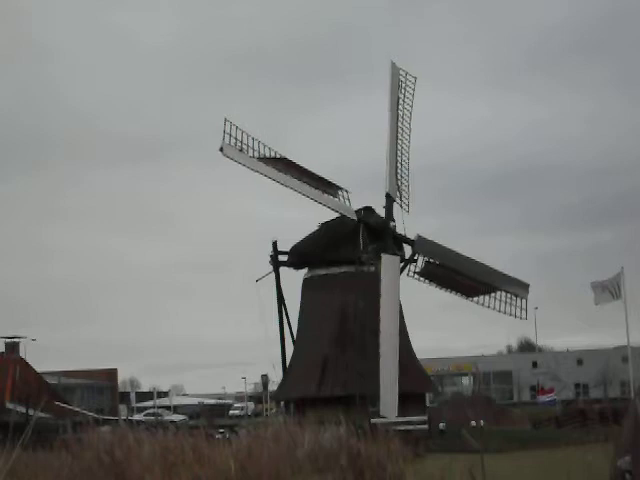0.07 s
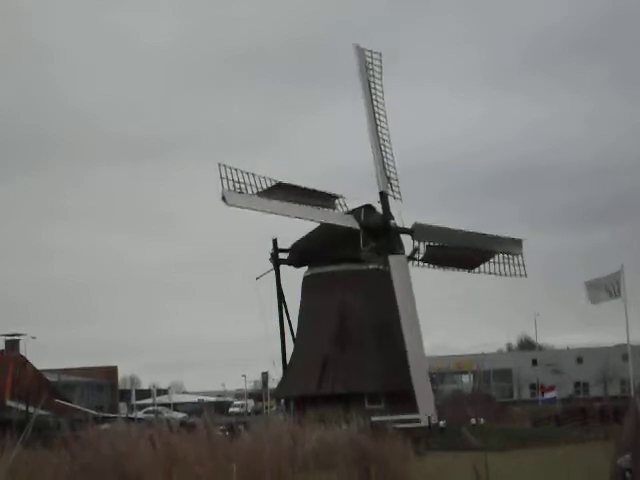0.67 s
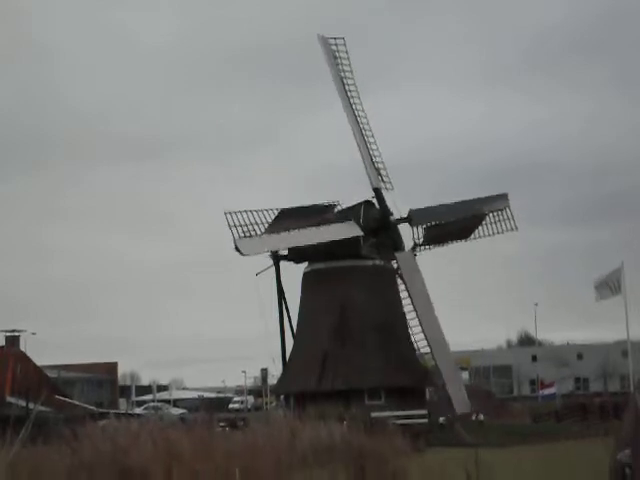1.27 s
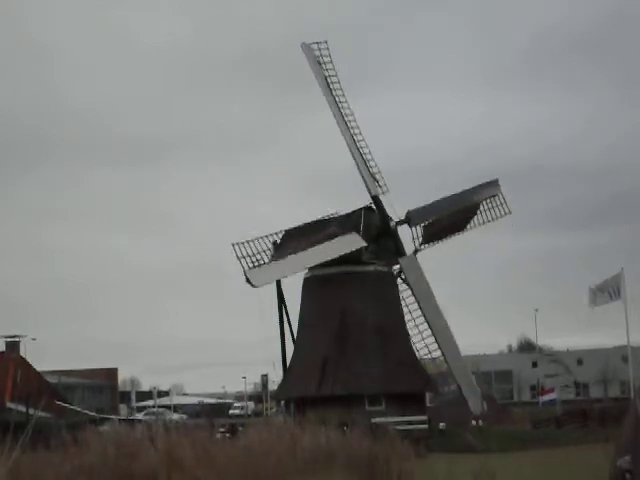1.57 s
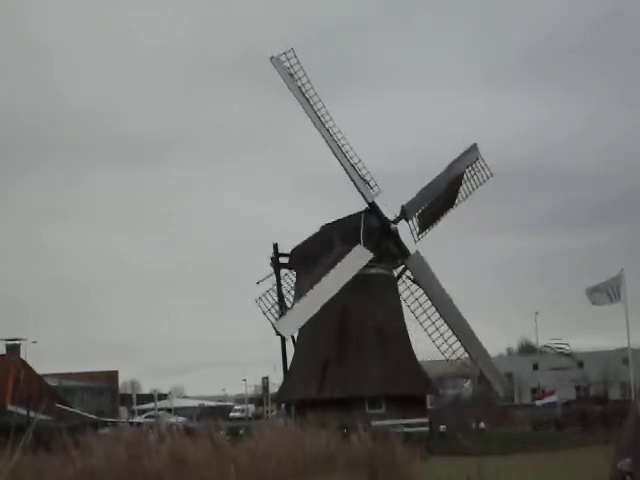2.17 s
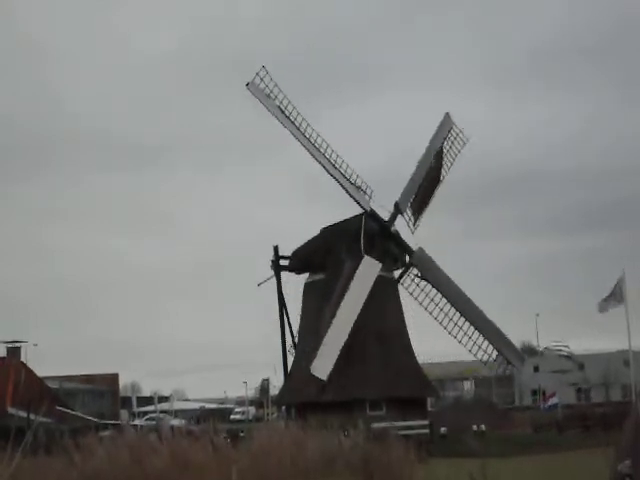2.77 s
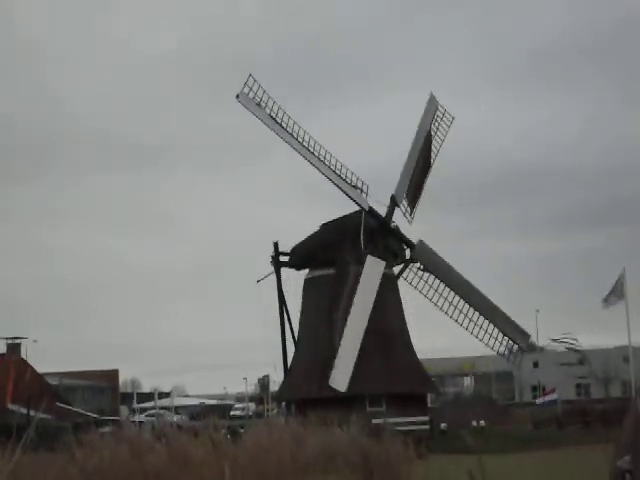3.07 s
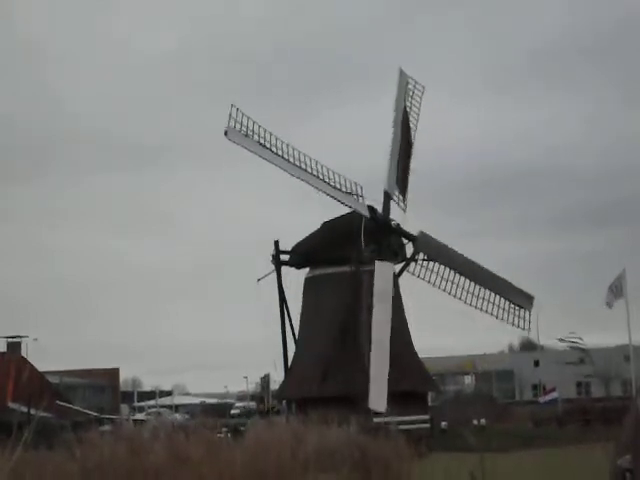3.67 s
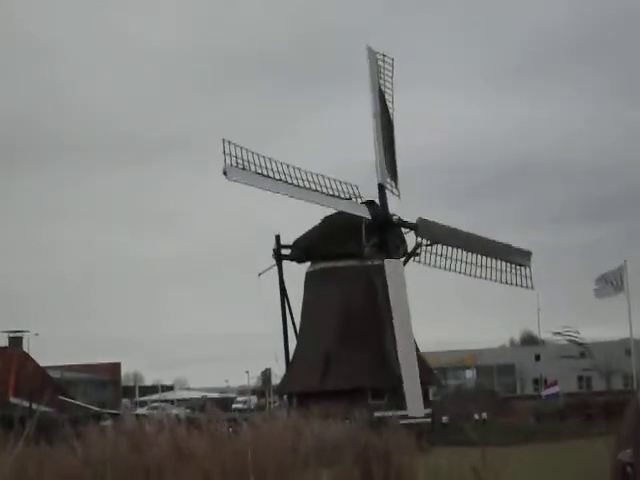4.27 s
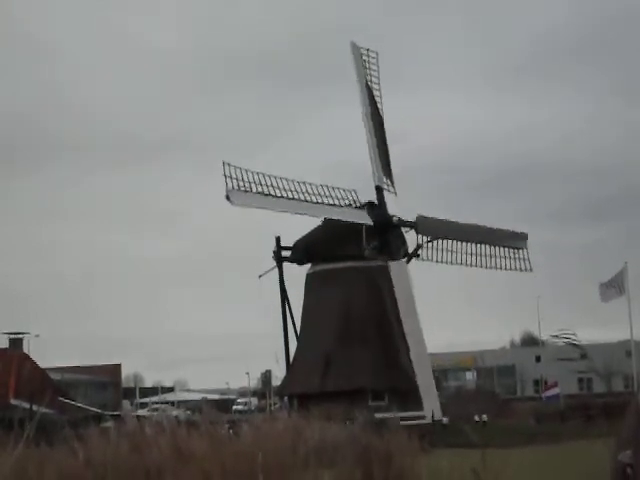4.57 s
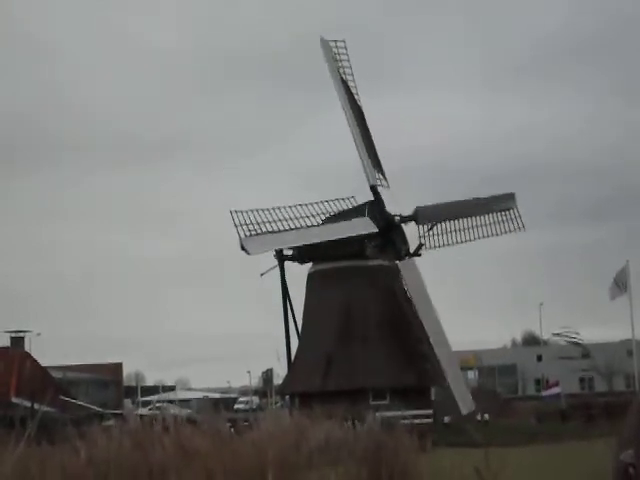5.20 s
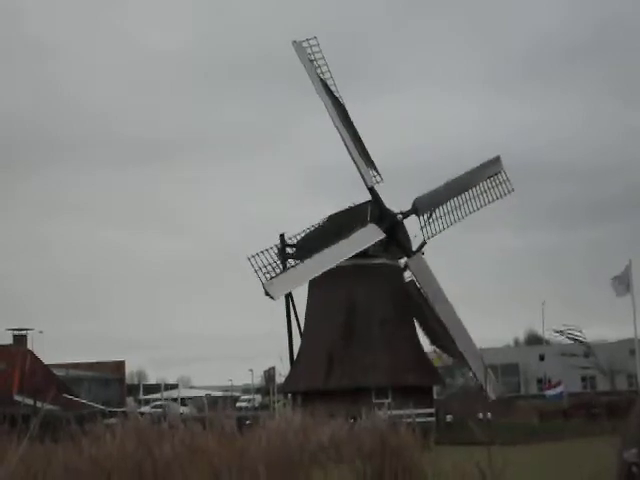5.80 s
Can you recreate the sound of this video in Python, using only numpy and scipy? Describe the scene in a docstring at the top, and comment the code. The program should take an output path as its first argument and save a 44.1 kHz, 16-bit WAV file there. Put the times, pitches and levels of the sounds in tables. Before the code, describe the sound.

A small camera stands outdoors near a windmill, its microphone open to the wind. The sound starts with a sharp pop, then a deep, uneven rumble and short dull puffs continue over faint, even hiss. Two barely audible distant chirps come in the first half, and a few faint far squeaks later. Fingers bump softly on the camera, most clearly near the end, around one sharp click.

```python
"""A small camera outdoors by a turning windmill, its microphone open to the wind.
The sound switches on with a pop; then eddies buffet the microphone with a deep rumble and short puffs
over a faint, even hiss. Two far chirps come in the first half, a few far squeaks later. Fingers bump
softly on the camera body now and then, most clearly near the end, around one sharp click."""
import sys
import numpy as np
from scipy import signal
from scipy.fft import rfft, irfft, next_fast_len
from scipy.io import wavfile
from scipy.ndimage import uniform_filter1d

SR = 44100
rng = np.random.default_rng(int(sys.argv[2]) if len(sys.argv) > 2 else 0)


def persist_wave(psi):
    """Save psi, clipped to +-1, as 16-bit WAV."""
    counts = np.round(np.clip(psi, -1, 1) * 32767).astype(np.int16)
    wavfile.write(sys.argv[1], SR, np.atleast_2d(counts).T)


N = 257544
TIME = np.arange(N) / SR
SWITCH_ON_S = 0.2583

# spectrum of the eddies at the microphone port: [f/Hz, relative level/dB]
EDDY_SPECTRUM = [(3, -3), (8, -0.5), (13, 8), (19, -2), (30, -11.5), (45, -15.5), (60, -23), (80, -28.5),
                 (110, -41), (160, -48), (250, -58), (600, -100), (12000, -140)]


def wind(throb_top_hz=27.85, rumble_split_hz=62.2, rumble_top_hz=121.3, gust_s=0.097, build_up_s=0.017):
    """Wind right on the microphone: large eddies throb, middling ones rumble, small ones flutter."""
    # breeze strength, heard as the low rumble: [t/s, level/dB]
    breeze_levels = [(0.38, -49), (0.5, -50), (0.65, -48.5), (0.83, -37), (0.97, -42), (1.1, -47),
                     (1.3, -47), (1.6, -43), (1.8, -45), (1.96, -43), (2.27, -50.5), (2.5, -39.5),
                     (2.65, -55.5), (2.8, -42.5), (3.17, -45), (3.52, -45), (4.13, -43.5), (4.33, -47.5),
                     (4.7, -43), (4.9, -48), (5.3, -50.5), (5.5, -41), (5.8, -43)]
    # the deepest throb: [t/s, level/dB]
    throb_levels = [(0.35, -30), (0.7, -29.5), (1.1, -39.5), (1.33, -25.5), (1.46, -27), (1.7, -40.5),
                    (2.05, -36), (2.28, -28.5), (2.48, -44.5), (2.64, -25.5), (2.88, -27.5), (3.0, -39),
                    (3.15, -28), (3.35, -41), (3.49, -26.5), (3.62, -35.5), (4.1, -30.5), (4.5, -34),
                    (5.1, -29), (5.62, -38), (5.78, -30.5)]
    # the upper rumble: [t/s, level/dB]
    upper_levels = [(0.4, -56), (0.65, -52.5), (0.9, -63), (1.17, -55.5), (1.4, -54), (1.52, -59),
                    (1.8, -63.5), (1.95, -58), (2.17, -56), (2.33, -57), (2.5, -56), (2.6, -56),
                    (2.76, -57), (2.9, -60), (3.02, -53), (3.22, -63), (3.41, -67), (3.61, -54),
                    (3.77, -64.5), (3.87, -57), (4.12, -55), (4.3, -61), (4.72, -59.5), (4.92, -59),
                    (5.15, -54.5), (5.6, -61), (5.8, -63)]
    breeze_db = in_time(breeze_levels)
    large = evened(cut(noise(EDDY_SPECTRUM), throb_top_hz, "low", order=4), gust_s)
    small = evened(cut(noise(EDDY_SPECTRUM), rumble_top_hz, "high", order=4), gust_s)
    throb = large * from_db(in_time(throb_levels))
    low = eddies(throb_top_hz, rumble_split_hz) * from_db(breeze_db)
    upper = eddies(rumble_split_hz, rumble_top_hz) * from_db(in_time(upper_levels))
    rumble = (low + upper) * from_db(-0.4 * drift(rate_hz=17))
    # the flutter follows a third of the breeze's swing and flickers by itself
    swing_db = breeze_db - breeze_db.mean()
    flutter = small * from_db(-69 + 0.33 * swing_db + 2 * drift(rate_hz=5.4))
    # the bass builds up just after the microphone comes alive
    build_up = np.clip((TIME - SWITCH_ON_S) / build_up_s, 0, 1)
    return (throb + rumble + flutter) * build_up


def eddies(low_hz, high_hz):
    """Buffeting by eddies of one range of sizes, held near rms 1."""
    buffeting = cut(noise(EDDY_SPECTRUM), low_hz, "high", order=8)
    return evened(cut(buffeting, high_hz, "low", order=6), span_s=0.12)


def puffs(lowest_hz=80):
    """Single eddies hit the microphone port squarely: each is a short, dull swell of air."""
    # puffs on the port: [t/s, level/dB, top f/Hz]
    hits = [(.58, -55.5, 124), (.82, -59, 85), (1.16, -59.5, 99), (1.315, -58.5, 184), (2.14, -61, 101),
            (2.455, -66, 220), (2.675, -62, 169), (3.02, -64, 113), (4.12, -67, 220), (4.76, -53.5, 109)]
    out = np.zeros(N)
    for at_s, level_db, top_hz in hits:
        swell = swell_at(at_s, length_s=0.055)
        turbulence = cut(rng.standard_normal(N), lowest_hz, "high")
        air = swell * cut(turbulence, top_hz, "low", order=4)
        out += from_db(level_db) * air * np.sqrt(np.sum(swell ** 2) / np.sum(air ** 2))
    return out


def clicks():
    """Sudden steps in the signal: the opening pop and a later, brighter click of opposite sign."""
    pop = band_limit(sharp_step(SWITCH_ON_S, level_db=-17, settle_s=0.18), hz=11400)
    return pop - sharp_step(at_s=5.4233, level_db=-23, settle_s=0.038)


def sharp_step(at_s, level_db, settle_s):
    """A sudden offset that dies away: heard as one sharp click."""
    return from_db(level_db) * (TIME >= at_s) * np.exp(-np.maximum(TIME - at_s, 0) / settle_s)


def bumps(casing_db=-12.5):
    """Fingers push the camera close to the microphone: the hand damps its body, the hollow casing rings."""
    # finger touches: [t/s, push level/dB, softness cut-off f/Hz, lowest f/Hz, hollow ring offset/dB]
    touches = [(0.716, -44, 230, 141, -5), (3.075, -46, 255, 142, -3), (5.2023, -36, 600, 192, 2),
               (5.451, -35, 160, 70, -3), (5.7384, -29, 507, 36, -4.5)]
    # modes of the hand-held body: [f/Hz, gain/dB, t60/s]
    body_modes = [(54, 0.5, 0.1), (85, 3, 0.025), (151, -5, 0.034), (282, -7, 0.021), (390, -14, 0.014),
                  (700, -11, 0.015), (1750, 4.5, 0.015)]
    out = np.zeros(N)
    for at_s, level_db, soft_hz, lowest_hz, hollow_db in touches:
        touch = from_db(level_db) * signal.unit_impulse(N, int(at_s * SR))
        push = cut(cut(touch, soft_hz, "low", order=3), lowest_hz, "high")
        out += sum(from_db(db) * ring(push, hz, t60) for hz, db, t60 in body_modes)
        # the casing rings more or less according to where the finger lands
        out += from_db(casing_db + hollow_db) * ring(push, hz=470, t60=0.043)
    return out


def squeaks():
    """Faint squeaks far off: each is a brief swell of narrow, wavering tone."""
    # far squeaks: [t/s, f/Hz, level/dB, length/s]
    tones = [(4.29, 2050, -79, 0.13), (4.45, 1980, -82, 0.14), (5.385, 1880, -76, .035),
             (5.49, 1585, -74, .044)]
    return sum(from_db(db) * swell_at(at_s, length_s) * evened(wavering(hz, width_hz=45), length_s)
               for at_s, hz, db, length_s in tones)


def chirps(length_s=0.11):
    """Far off, perhaps a small bird: short, husky clusters of high partials, barely above the hiss."""
    # far chirps: [t/s, level/dB]
    calls = [(0.48, -80), (2.255, -79.5)]
    # partials of a chirp: [f/Hz, relative level/dB]
    partials = [(3620, -5), (3870, -2), (4140, 0.5), (4330, -5)]
    voice = sum(from_db(db) * evened(wavering(hz, width_hz=75), length_s) for hz, db in partials)
    return voice * sum(from_db(db) * swell_at(at_s, length_s) for at_s, db in calls)


def hiss(hiss_db=-64, ring_db=-87):
    """The noise floor: amplifier noise and distant air, with a faint ring and a trace of whine."""
    # spectrum of the even hiss: [f/Hz, relative level/dB]
    hiss_spectrum = [(40, 6), (250, -1), (400, -2), (700, -4.5), (1500, -7.5), (3000, -10), (6000, -13.5),
                     (9000, -14.5), (10100, -15), (10550, -20.5), (11000, -33), (11700, -30.5),
                     (12500, -73), (16000, -54)]
    # thin whine of the electronics: [f/Hz, rms level/dB]
    whine_tones = [(7139, -93), (7850, -99)]
    air = noise(hiss_spectrum) * from_db(hiss_db)
    faint_ring = wavering(hz=3706, width_hz=86) * from_db(ring_db)
    whine = sum(np.sqrt(2) * from_db(db) * np.sin(2 * np.pi * (hz * TIME + rng.random()))
                for hz, db in whine_tones)
    return (air + faint_ring + whine) * (TIME >= SWITCH_ON_S)


def from_db(db):
    """Decibels to gain."""
    return 10 ** (np.asarray(db) / 20)


def rms_one(x):
    """Scale to unit rms."""
    return x / np.sqrt(np.mean(x ** 2) + 1e-20)


def evened(x, span_s):
    """Hold the slow level at rms 1, leaving the quick lumps."""
    size = max(int(span_s * SR), 1)
    power = uniform_filter1d(uniform_filter1d(x ** 2, size), size)
    return x / np.sqrt(np.maximum(power, 1e-12))


def in_time(rows):
    """A curve through [t/s, value] rows, at every sample."""
    return np.interp(TIME, *np.transpose(rows))


def swell_at(at_s, length_s):
    """A smooth rise and fall of height 1."""
    return np.exp(-(2 * (TIME - at_s) / length_s) ** 2)


def cut(x, hz, kind, order=2):
    """Causal low-pass or high-pass."""
    return signal.sosfilt(signal.butter(order, hz, kind, fs=SR, output="sos"), x + 1e-18)


def band_limit(x, hz):
    """Steep, symmetric low-pass of a digital recorder."""
    return signal.sosfiltfilt(signal.butter(16, hz, fs=SR, output="sos"), x + 1e-18)


def noise(spectrum):
    """Steady noise coloured by [f/Hz, relative level/dB] rows; rms 1."""
    size = next_fast_len(N)
    hz, level_db = np.transpose(spectrum)
    grid_hz = np.maximum(np.fft.rfftfreq(size, 1 / SR), 1)
    gain = from_db(np.interp(np.log(grid_hz), np.log(hz), level_db))
    return rms_one(irfft(rfft(rng.standard_normal(size)) * gain, size)[:N])


def drift(rate_hz):
    """Smooth random wander, up to about rate_hz; rms 1."""
    hz = np.fft.rfftfreq(N, 1 / SR)
    return rms_one(irfft(rfft(rng.standard_normal(N)) * np.exp(-(hz / rate_hz) ** 2), N))


def wavering(hz, width_hz):
    """A narrow, unsteady tone; rms 1."""
    phase = 2 * np.pi * hz * TIME
    return drift(width_hz) * np.sin(phase) + drift(width_hz) * np.cos(phase)


def ring(push, hz, t60):
    """A unit push sets a dying sine of height 1 ringing."""
    decay = np.exp(-np.log(1000) / (t60 * SR))
    step = 2 * np.pi * hz / SR
    return signal.lfilter([0, np.sin(step)], [1, -2 * decay * np.cos(step), decay ** 2], push + 1e-18)


def scene():
    """Near and far meet at one microphone in the open air."""
    return (wind() + puffs() + hiss() + bumps() + squeaks() + chirps() + clicks())[None, :]


def record(dry):
    """The camera's recorder cuts the top of the treble."""
    return band_limit(dry, hz=16300)


dry = scene()
out = record(dry)
persist_wave(out)
```